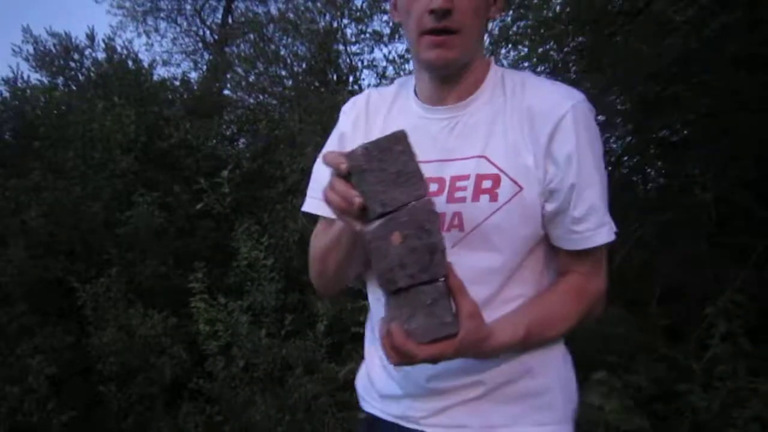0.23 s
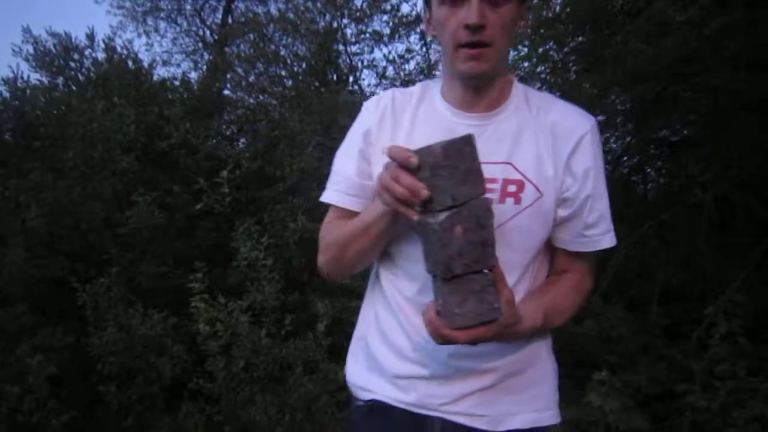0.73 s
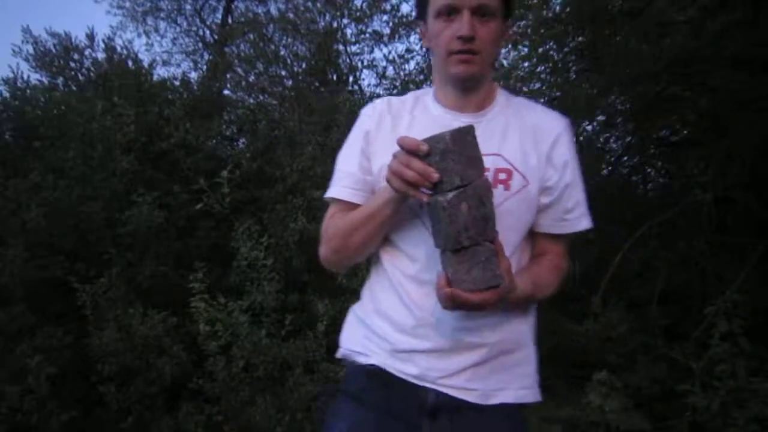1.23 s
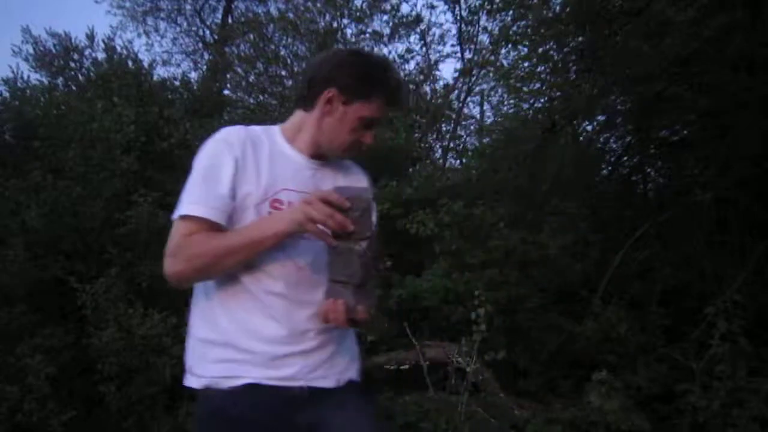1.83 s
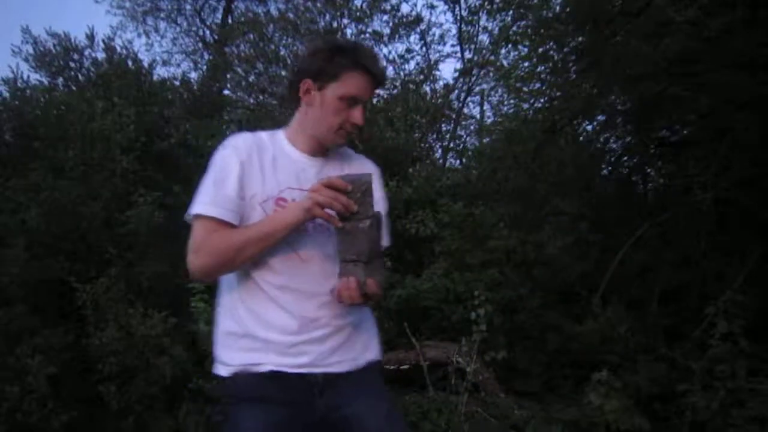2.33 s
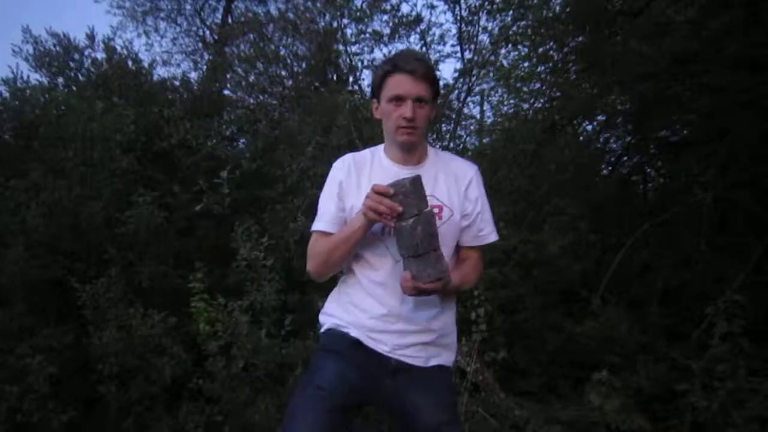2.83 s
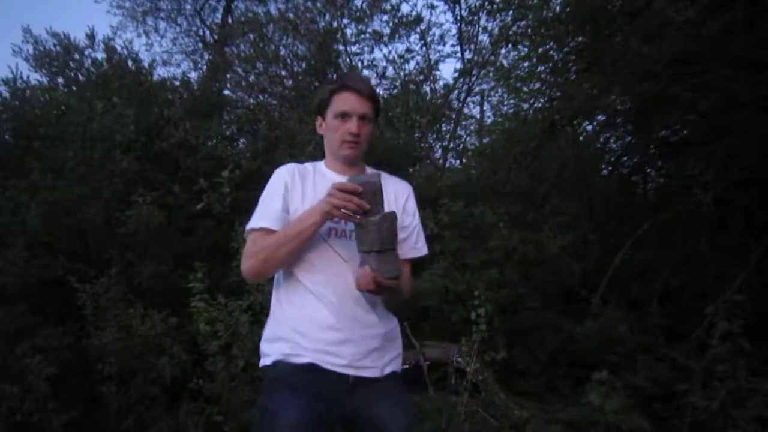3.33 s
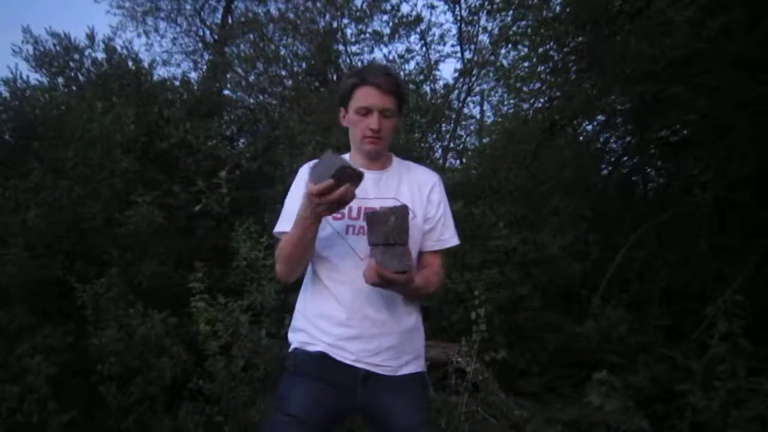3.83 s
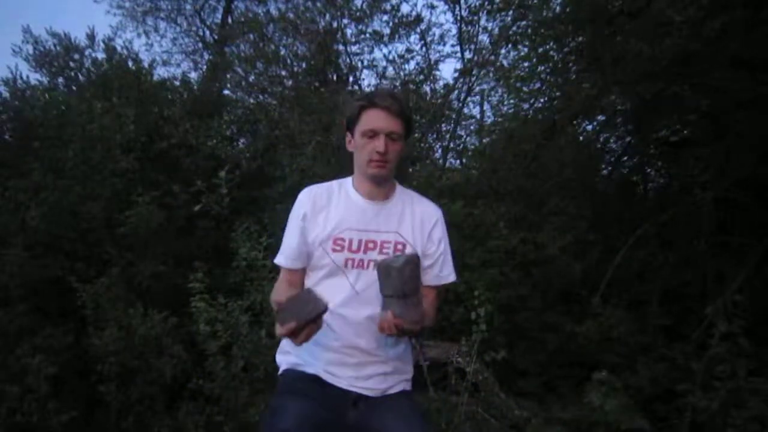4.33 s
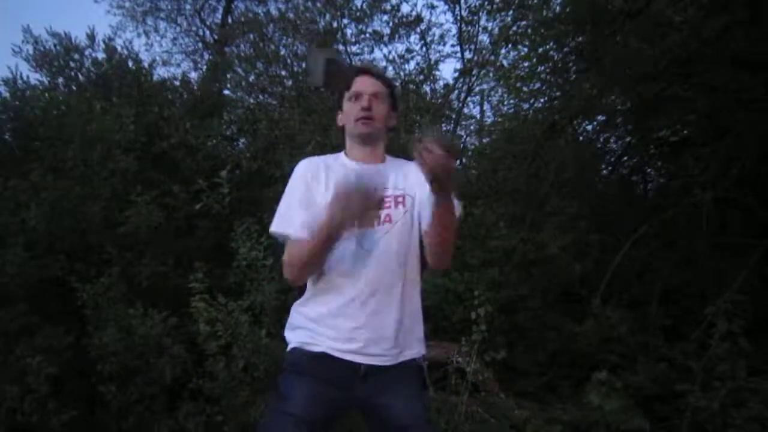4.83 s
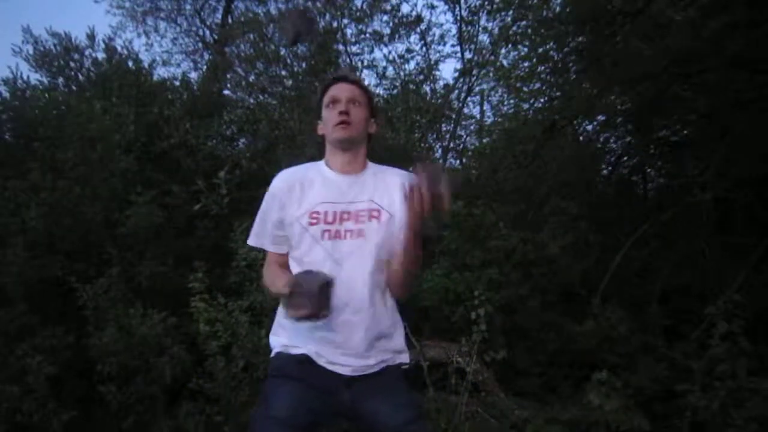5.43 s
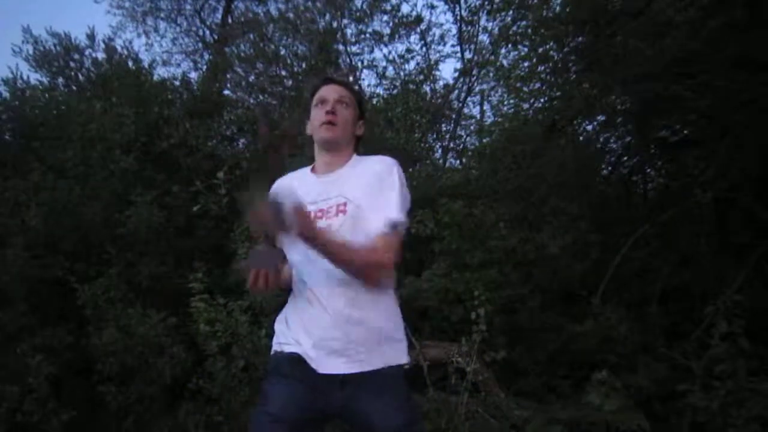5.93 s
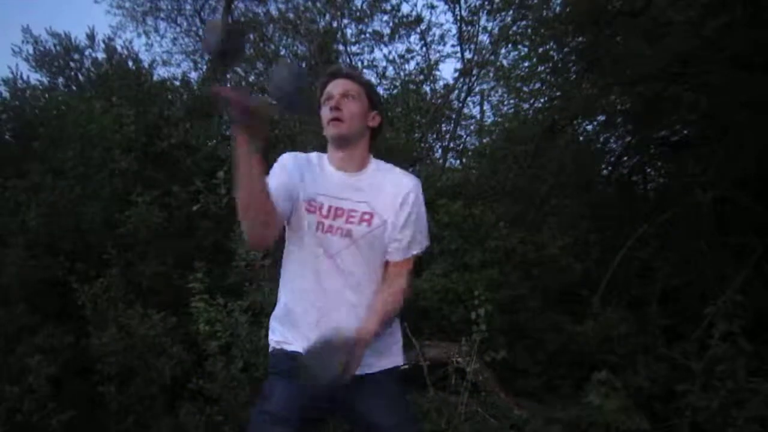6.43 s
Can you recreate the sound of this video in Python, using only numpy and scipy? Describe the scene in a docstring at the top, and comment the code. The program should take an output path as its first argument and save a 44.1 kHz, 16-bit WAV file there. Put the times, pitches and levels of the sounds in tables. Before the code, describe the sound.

Close by, stone blocks slide against each other with a light gritty rub and a few sharp knocks, followed later by a soft, dull catch. Over them a nightingale sings clearly among trees: chips and whistles first, then two upward swoops, quick pairs of falling notes and a rapid trill of ticks, all lightly echoing. A low outdoor rumble and a faint faraway engine lie underneath.

```python
"""Nightingale and juggler at dusk

A nightingale sings at the edge of a wood: chips, thin whistles, two swoops, loud paired down-sweeps
and a ticking trill. Trunks and leaves scatter the song back. Close by, paving stones rub and click
in a juggler's hands, with soft swells of noise. A far engine drones under the air's low rumble."""
import sys
import numpy as np
from scipy import signal
from scipy.fft import rfft, irfft, next_fast_len
from scipy.io import wavfile

SR = 44100
rng = np.random.default_rng(int(sys.argv[2]) if len(sys.argv) > 2 else 0)


def master_out(mix):
    """Clip the mix to full scale and print it as 16-bit PCM to the path in sys.argv[1]."""
    frames = np.transpose(np.atleast_2d(mix))
    ceiling = np.clip(frames, -1, 1)
    pcm = np.round(ceiling * 32767).astype(np.int16)
    wavfile.write(sys.argv[1], SR, pcm)


N = 295470


def from_db(db):
    return 10 ** (np.asarray(db) / 20)

def rms_one(x):
    return x / np.sqrt(np.mean(x ** 2) + 1e-20)

def clock(length_s):
    return np.arange(int(length_s * SR)) / SR

def phase_of(pitch_hz):
    return 2 * np.pi * np.cumsum(pitch_hz) / SR

def gain_at(spectrum, hz):
    """Gain of a (Hz, dB) spectrum at any frequency."""
    points_hz, db = np.transpose(spectrum)
    return from_db(np.interp(np.log(hz + 1e-9), np.log(points_hz), db))

def coloured(x, spectrum):
    size = next_fast_len(2 * len(x))
    return irfft(rfft(x, size) * gain_at(spectrum, np.fft.rfftfreq(size, 1 / SR)), size)[:len(x)]

def noise(spectrum):
    return rms_one(coloured(rng.standard_normal(N), spectrum))

def wobble(count, rate_hz):
    """Smooth random drift, spread about 1."""
    return np.interp(np.arange(count) * rate_hz / SR, np.arange(2048), rng.standard_normal(2048))

def add(out, start_s, sound):
    start = max(round(start_s * SR), 0)
    out[start:start + len(sound)] += sound[:max(N - start, 0)]

def envelope(t, attack_s, release_s):
    attack = np.sin(np.pi / 2 * np.clip(t / attack_s, 0, 1))
    release = np.sin(np.pi / 2 * np.clip((t[-1] - t) / release_s, 0, 1))
    return attack * release

def swell(t, centre, width):
    return np.exp(-np.minimum(((t - centre) / width) ** 2, 20))

def strokes(rows, range_db=20):
    """Gain curve: each stroke rises and fades by range_db over its rise and fade times."""
    t = np.arange(N) / SR
    levels_db = [db - range_db * np.maximum((s - t) / rise, (t - s) / fade) for s, db, rise, fade in rows]
    return from_db(np.max(levels_db, axis=0))


# Each row: frequency in Hz, noise density in dB.
AIR_SPECTRUM = [(20, -13), (32, -5.5), (46, 2.5), (58, 0), (90, -4.5), (160, -12), (500, -13), (1000, -16),
                (1400, -24), (2000, -32), (4000, -37), (6500, -42), (10000, -46.5), (16000, -50)]

def air(level_db=-40):
    """Evening air and far traffic: a steady rumble."""
    return from_db(level_db) * noise(AIR_SPECTRUM)


# Each row: peak time in seconds, level in dB, rise in seconds, fade in seconds.
SOFT_RUBS = [(.06, -45.5, 0.51, 0.39), (.54, -46, 0.12, 0.13), (1.355, -53, .11, .12),
             (2.62, -51, .2, 0.33)]
# Each row: frequency in Hz, noise density in dB.
SOFT_RUB_SPECTRUM = [(300, -4), (900, 0.5), (2000, -4), (3200, -5), (5000, -13), (10000, -28)]

def soft_rubs():
    """Soft mid-range noise swells, mostly along with the stone rubbing."""
    return strokes(SOFT_RUBS) * noise(SOFT_RUB_SPECTRUM)


# Each row: time of hardest push in seconds, level in dB, rise in seconds, fade in seconds.
SLIDES = [(.08, -54.5, 0.28, 0.27), (.54, -45.5, 0.21, 0.17), (.91, -50.5, 0.26, 0.23),
          (1.355, -39.5, 0.087, 0.078), (1.55, -48, 0.78, 0.5), (2.48, -49.5, .24, 0.29),
          (2.77, -50, 0.32, 0.23), (3.11, -41.5, .27, 0.083), (3.40, -39, .1, 0.051)]
# Each row: frequency in Hz, noise density in dB.
GRIT_SPECTRUM = [(300, -6), (1000, 1.5), (2000, 1), (3500, -3), (6000, 2.5), (9000, -7.5), (15000, -12.5)]

def stone_slides(grains_per_s=7000, spread_db=4):
    """Grit crackles between sliding stone faces."""
    grains = (rng.random(N) < grains_per_s / SR) * rng.standard_normal(N)
    grit = grains * from_db(spread_db * rng.standard_normal(N))
    return strokes(SLIDES) * rms_one(coloured(grit, GRIT_SPECTRUM))


# Beak resonances. Each row: frequency in Hz, overtone gain in dB.
BEAK = [(3000, -25.5), (5000, -31), (6500, -34.5), (8500, -38), (10500, -32.5), (11500, -37.5),
        (12500, -39), (16000, -45)]

def voice(pitch_hz, overtone_db, rolloff_db, jitter=0.0038, flutter_db=3):
    """The syrinx gives a nearly pure tone; faint unsteady overtones roll off above the third."""
    count = len(pitch_hz)
    phase = phase_of(pitch_hz * (1 + jitter * wobble(count, 400)))
    tone = np.sin(phase)
    for k in range(2, 6):
        db = overtone_db - rolloff_db * max(k - 3, 0) + flutter_db * wobble(count, 200)
        tone += gain_at(BEAK, k * pitch_hz) * from_db(db) * np.sin(k * phase) * (k * pitch_hz < SR / 2)
    return tone

def gesture(shape, jitter, edge_share=.025, min_edge_ms=0.77):
    """Pitch and level of one syllable; the syrinx is never quite steady."""
    ms, hz, db = np.transpose(shape)
    t_ms = np.arange(0, ms.max(), 1000 / SR)
    pitch_hz = np.interp(t_ms, ms, hz) * (1 + jitter * wobble(len(t_ms), 440))
    edge_s = max(edge_share * t_ms[-1], min_edge_ms) / 1000
    return pitch_hz, from_db(np.interp(t_ms, ms, db)) * envelope(t_ms / 1000, edge_s, edge_s)


# Each row: offset in milliseconds, pitch in Hz, level in dB.
CHIP_SHAPE = [(0, 7250, -44.5), (10.1, 6850, -27), (19, 6600, -27), (27.7, 6800, -23.5), (36.6, 7550, -27),
              (43.1, 8240, -42), (48.7, 7400, -44), (50.6, 6400, -21), (54.5, 4500, -32.5)]
# Each row: start in seconds, gain in dB.
CHIPS = [(.177, -13.5), (.811, -2.5), (1.455, 2)]

def chips():
    """A high note dips, rises and snaps down."""
    out = np.zeros(N)
    for s, db in CHIPS:
        pitch_hz, level = gesture(CHIP_SHAPE, jitter=0.0018)
        add(out, s, from_db(db) * level * voice(pitch_hz, overtone_db=0, rolloff_db=19.5))
    return out


# Colour of all echoes, and dulling on the long path. Each row: frequency in Hz, gain in dB.
FOLIAGE = [(1000, 3.5), (2000, 4.5), (3000, 5.5), (4500, 4), (5500, 8.5), (6600, 5), (8000, 3), (10500, 9),
           (15000, 4.5)]
DEEP_WOOD = [(1000, 4.5), (3000, -1.5), (4500, -6.5), (6500, -9), (12000, -13)]

def wood_echoes(x, near_db=-13, near_t60_s=0.24, far_db=-21, far_t60_s=.97, trunks_per_s=1400):
    """Separate echoes from near trunks, then a faint smooth wash from deeper in."""
    t = clock(1.5)
    onset = np.clip(t / 0.0013 - 1, 0, 1)
    trunks = rng.standard_normal(len(t)) * (rng.random(len(t)) < trunks_per_s / SR)
    trunks *= from_db(-60 * t / near_t60_s) * onset
    leaves = rng.standard_normal(len(t)) * from_db(-60 * t / far_t60_s) * onset
    near = from_db(near_db) * trunks / np.linalg.norm(trunks)
    far = from_db(far_db) * coloured(leaves / np.linalg.norm(leaves), DEEP_WOOD)
    return signal.fftconvolve(x, coloured(near + far, FOLIAGE))[:N]


# Each row: start in seconds, length in seconds, start pitch in Hz, held pitch in Hz,
# slide time in seconds, first swell in dB, second swell in dB, overtone gain in dB.
WHISTLES = [(0.427, .218, 3780, 4503, .034, -21.5, -16.8, -8),
            (1.057, .24, 3500, 4303, .034, -22, -16.3, -1.5),
            (3.233, .078, 1117, 1855, 0.011, -46, -20, -12)]

def whistles():
    """The pitch slides up to a held note while the level swells twice."""
    out = np.zeros(N)
    for s, length_s, start_hz, held_hz, slide_s, first_db, second_db, overtone_db in WHISTLES:
        t = clock(length_s)
        pitch_hz = held_hz + (start_hz - held_hz) * np.exp(-t / slide_s)
        first = from_db(first_db) * swell(t, centre=0.24 * length_s, width=0.19 * length_s)
        second = from_db(second_db) * swell(t, centre=length_s - .028, width=.038)
        level = (first + second) * envelope(t, attack_s=.008, release_s=.018)
        add(out, s, level * voice(pitch_hz, overtone_db, rolloff_db=17.5, jitter=.0025))
    return out


def blows(rows, spectrum, t60_s):
    """Each contact is a fast-dying noise burst, coloured by what is struck."""
    strikes, white = np.zeros(N), rng.choice([-1., 1.], N)
    for s, db in rows:
        add(strikes, s, from_db([db]))
    decays = signal.lfilter([1], [1, -from_db(-60 / (t60_s * SR))], strikes + 1e-18)
    return coloured(white * decays, spectrum) / np.std(coloured(white[:SR], spectrum))


# Each row: start in seconds, level in dB.
KNOCKS = [(.737, -35), (1.428, -36), (1.5645, -21.5), (1.692, -31), (2.442, -43), (3.082, -20.5),
          (3.245, -29), (4.295, -28), (4.316, -37), (4.381, -37), (5.433, -42), (5.985, -47), (6.669, -35),
          (6.689, -39)]
# Each row: frequency in Hz, noise density in dB.
STONE_EDGE = [(300, -5.5), (1000, -14), (2000, -1), (3500, 0), (6000, 5.5), (9000, 1.5), (12500, -7),
              (16000, -4.5)]
STONE_BODY = [(60, -20.5), (200, -0.5), (500, -4), (800, -1.5), (1400, -10), (2500, -11), (6000, -29)]

def stone_knocks(body_db=-11, echo_db=-9):
    """Stone meets stone: a sharp edge click and a short dull body, echoed by the wood."""
    click = blows(KNOCKS, STONE_EDGE, t60_s=0.0076)
    knocks = click + from_db(body_db) * blows(KNOCKS, STONE_BODY, t60_s=0.073)
    return knocks + from_db(echo_db) * wood_echoes(knocks)


# Each row, by kind: start pitch in Hz, lowest pitch in Hz, wait in seconds, fall time in seconds,
# bow (1 = even fall), length in seconds, attack in seconds, release in seconds.
FALL_KINDS = { "dip": (2680, 1920, .009, .052, 2.0, .067, .03, .016),
              "hook": (3850, 2150, 0, .025, 1.4, 0.03, 0.001, 0.004),
              "plunge": (4200, 1400, 0, .03, 1.1, .031, 0.0016, 0.0044),
              "deep plunge": (3820, 1290, 0, .034, 1.1, .042, .0025, .003),
              "low slur": (1380, 1130, 0, .05, 1.0, .06, .005, .06),
              "hoot": (1240, 1190, 0, 0.045, 0.84, .05, 0.011, 0.054),
              "low whistle": (1670, 1475, 0, .07, 1.4, .075, 0.049, .004), }
# Each row: pitch in Hz, gain in dB.
THROAT_RESONANCE = [(1200, -23.5), (1430, -20.5), (1750, -12.5), (2000, -6.5), (2300, -4), (2900, 0.5),
                    (3400, 0), (4300, -12)]

def fall(kind, db, overtone_db, rolloff_db, lift=1, jitter=0.0047):
    """A note fades as it sinks out of the throat's resonance; lift scales its lowest pitch."""
    start_hz, low_hz, wait_s, fall_s, bow, length_s, attack_s, release_s = FALL_KINDS[kind]
    t, low_hz = clock(length_s), lift * low_hz
    height = np.abs(1 - np.maximum(t - wait_s, 0) / fall_s) ** bow
    flick = 1 + 0.16 * np.exp(-t / 0.00067)   # starts sharp for an instant
    pitch_hz = low_hz * (start_hz / low_hz) ** height * flick
    level = from_db(db) * gain_at(THROAT_RESONANCE, pitch_hz) * envelope(t, attack_s, release_s)
    return level * voice(pitch_hz, overtone_db, rolloff_db, jitter)


# Each row: start in seconds, kind, gain in dB, overtone gain in dB.
SINGLE_FALLS = [(1.693, "dip", -12.5, -4), (2.381, "dip", -11.5, -2), (3.169, "low slur", -16.5, -15),
                (6.522, "deep plunge", -15.5, -2.5), (6.634, "low whistle", -9.5, -5)]

def single_falls():
    """Lone falling notes around the phrases."""
    out = np.zeros(N)
    for s, kind, db, overtone_db in SINGLE_FALLS:
        add(out, s, fall(kind, db, overtone_db, rolloff_db=17))
    return out


# Each row: start in seconds, length in seconds, peak level in dB.
SWOOPS = [(1.865, .195, -15.5), (2.567, .197, -15.5)]

def swoops(start_hz=2340, top_hz=4480, creep_hz_per_s=3300, growth_s=.025, sag_db_per_s=30.5):
    """The pitch creeps, leaps, then eases to its top; after a slow attack the level sags."""
    out = np.zeros(N)
    attack_s, leap_lead_s, ease_hz, ease_s = 0.073, .011, 480, .03
    for s, length_s, db in SWOOPS:
        t = clock(length_s)
        leap_hz = (top_hz - start_hz) * np.exp((t - length_s + leap_lead_s) / growth_s)
        ceiling_hz = top_hz - ease_hz * np.minimum((length_s - t) / ease_s, 1)
        pitch_hz = np.minimum(start_hz + creep_hz_per_s * t + leap_hz, ceiling_hz)
        sag_db = sag_db_per_s * np.maximum(t - attack_s, 0)
        level = from_db(db - sag_db) * envelope(t, attack_s, release_s=0.019) ** 1.25
        add(out, s, level * voice(pitch_hz, overtone_db=-6, rolloff_db=18, jitter=.004))
    return out


# Each row: peak time in seconds, level in dB, half width in seconds.
ENGINE_SWELLS = [(2.25, -44, .42), (3.35, -44, .15), (4.2, -43, .18), (5.5, -50, 1.0)]

def engine(firing_hz=96.4, rise_hz_per_s=4.35, waver=.01, flutter_db=2):
    """A far drone gathers speed and fades in and out on the air; its octave comes up once."""
    t = np.arange(N) / SR
    phase = phase_of((firing_hz + rise_hz_per_s * t) * (1 + waver * wobble(N, 12)))
    level = sum(from_db(db) * swell(t, s, width_s) for s, db, width_s in ENGINE_SWELLS)
    octave = from_db(-50) * swell(t, centre=5.55, width=.5) * np.sin(2 * phase)
    return (level * np.sin(phase) + octave) * from_db(flutter_db * wobble(N, 6))


# Throat and open beak in harsh sounds. Each row: frequency in Hz, gain in dB.
OPEN_THROAT = [(1000, -48), (1800, -24), (2500, -13), (4000, -7.5), (5200, -3), (6300, -3), (7500, -10.5),
               (10000, -25.5), (16000, -31)]
# Each row: peak time in seconds, level in dB.
RATTLE_PULSES = [(2.1912, -28), (2.196, -33), (2.2149, -26), (2.2239, -32.5), (2.926, -35), (2.9311, -27.5),
                 (2.9524, -31), (2.9582, -28)]

def rattles(width_s=0.00078):
    """Pairs of very short harsh pulses follow each swoop."""
    t = np.arange(N) / SR
    pulses = (from_db(db) * swell(t, s, np.sqrt(2) * width_s) for s, db in RATTLE_PULSES)
    return noise(OPEN_THROAT) * sum(pulses)


# Each row: start in seconds, factor on the hook's lowest pitch.
SWEEP_PAIRS = [(3.474, 0.99), (3.7238, 1.03), (3.9557, 1.05), (4.1895, 1.065), (4.4273, 1.05),
               (4.6614, 1.084), (4.9010, 1.075)]

def paired_sweeps(plunge_after_s=.0402, hoot_after_s=.1, hoot_scatter=0.022):
    """Two bright falls, a hook then a plunge; a soft hoot fills each gap between pairs."""
    out = np.zeros(N)
    for s, lift in SWEEP_PAIRS:
        add(out, s, fall("hook", db=-13, overtone_db=0.5, rolloff_db=12, lift=lift))
        add(out, s + plunge_after_s, fall("plunge", db=-12.5, overtone_db=1.5, rolloff_db=10))
    for s, _ in SWEEP_PAIRS[:-1]:
        lift = 1 + hoot_scatter * rng.standard_normal()
        hoot = fall("hoot", db=-13, overtone_db=-10, rolloff_db=3, lift=lift, jitter=.045)
        add(out, s + hoot_after_s, hoot)
    return out


def buzz(start_s=5.063, length_s=.058, gain_db=-26, start_hz=820, top_hz=2670, growth_s=0.033):
    """Slow pulses of the syrinx open the trill: raspy harmonics climb through the throat resonance."""
    out, t = np.zeros(N), clock(length_s)
    climb = np.expm1(t / growth_s) / np.expm1(t[-1] / growth_s)
    pitch_hz = (start_hz + (top_hz - start_hz) * climb) * (1 + 0.012 * wobble(len(t), 400))
    phase, harmonics = phase_of(pitch_hz), np.zeros(len(t))
    for k in range(1, 10):
        gain = gain_at(OPEN_THROAT, k * pitch_hz) * (k * pitch_hz < SR / 2)
        harmonics += gain * np.sin(k * phase + 2 * np.pi * rng.random())
    rasp = 0.37 * noise(OPEN_THROAT)[:len(t)]
    level = from_db(gain_db) * envelope(t, attack_s=0.019, release_s=0.0073)
    add(out, start_s, level * (harmonics + rasp))
    return out


# Each row: start in seconds, gain in dB.
TICKS = [(5.1577, -1.5), (5.2613, 0), (5.352, -2.5), (5.444, -5), (5.541, -3), (5.6328, -3.5), (5.7234, -5),
         (5.8091, -4), (5.8946, -4), (5.9855, -3), (6.077, -2.5), (6.1694, -1.5), (6.257, -2.5),
         (6.345, -0.5), (6.4318, -4)]
# Each row: offset in milliseconds, pitch in Hz, level in dB.
TICK_UPPER = [(0, 7500, -30.5), (1.5, 7170, -27), (3.2, 6350, -24), (4.8, 5510, -27.5)]
TICK_LOWER = [(0, 4860, -33), (1.5, 4340, -34), (4, 3100, -34.5)]
# Each row: frequency in Hz, noise density in dB.
TICK_EDGE = [(1500, -19), (4000, 6), (7000, -2), (10500, -3), (13000, -15), (16000, -11)]

def trill(rasp=0.18):
    """In each tick both sides of the syrinx fall together under a crisp edge of noise."""
    out, hiss = np.zeros(N), noise(TICK_EDGE)
    for s, db in TICKS:
        upper_hz, upper_level = gesture(TICK_UPPER, jitter=0.021)
        lower_hz, lower_level = gesture(TICK_LOWER, jitter=0.019)
        edge = rasp * hiss[round(s * SR):][:len(upper_hz)]
        add(out, s, from_db(db) * upper_level * (np.sin(phase_of(upper_hz)) + edge))
        add(out, s, from_db(db) * lower_level * np.sin(phase_of(lower_hz)))
    return out


# Each row: start in seconds, level in dB.
CATCHES = [(5.17, -40), (5.22, -33)]
# Each row: frequency in Hz, noise density in dB.
PALM_SPECTRUM = [(20, -9.5), (50, 9), (130, 5), (300, -15), (1000, -43), (4000, -52)]

def stone_catches(thud_hz=70, thud_t60_s=.03, thud_gain_db=5):
    """A stone lands in the palm: a dull burst and one push of air."""
    out, t = blows(CATCHES, PALM_SPECTRUM, t60_s=0.12), clock(3 * thud_t60_s)
    for s, db in CATCHES:
        level = from_db(db + thud_gain_db - 60 * t / thud_t60_s)
        add(out, s, -level * np.sin(2 * np.pi * thud_hz * t))
    return out


def scene(trill_send_db=2):
    """The bird and its echoes, the juggler and the background, in mono."""
    song = rattles() + whistles() + chips() + swoops() + single_falls() + paired_sweeps() + buzz()
    ticks = trill()
    echoes = wood_echoes(song + from_db(trill_send_db) * ticks)
    juggler = stone_slides() + stone_knocks() + stone_catches()
    return (song + ticks + echoes + juggler + soft_rubs() + engine() + air())[None]


# Each row: frequency in Hz, gain in dB.
MICROPHONE_PORT = [(20, 0), (6600, 0), (7200, -6), (7550, -13), (7850, -27), (8200, -13), (9000, -5.5),
                   (10500, -1), (12500, -1), (16000, -5)]

def record(dry, cutoff_hz=16000):
    """The microphone port puts a deep null in the treble; a steep low-pass cuts the top."""
    heard = np.array([coloured(channel, MICROPHONE_PORT) for channel in dry])
    return signal.sosfilt(signal.ellip(10, .1, 80, cutoff_hz, fs=SR, output="sos"), heard)


dry = scene()
out = record(dry)
master_out(out)
```